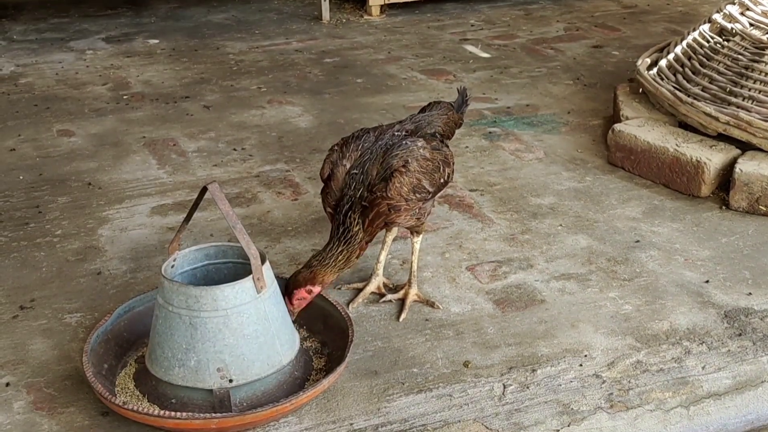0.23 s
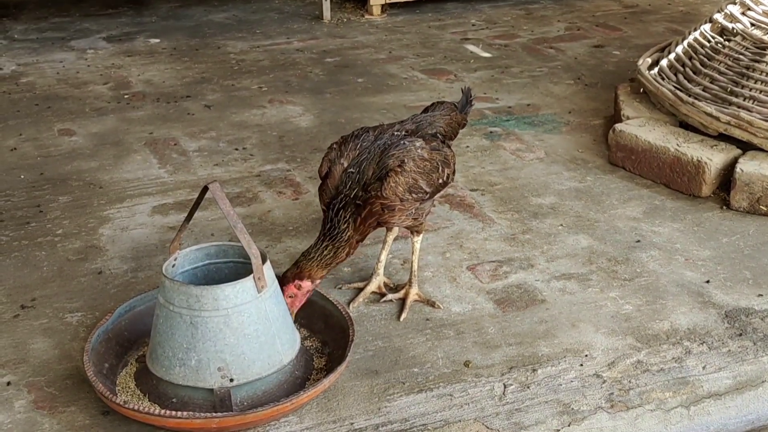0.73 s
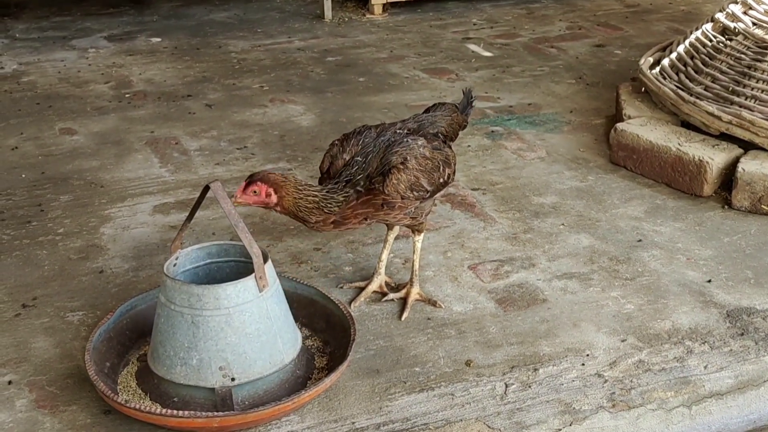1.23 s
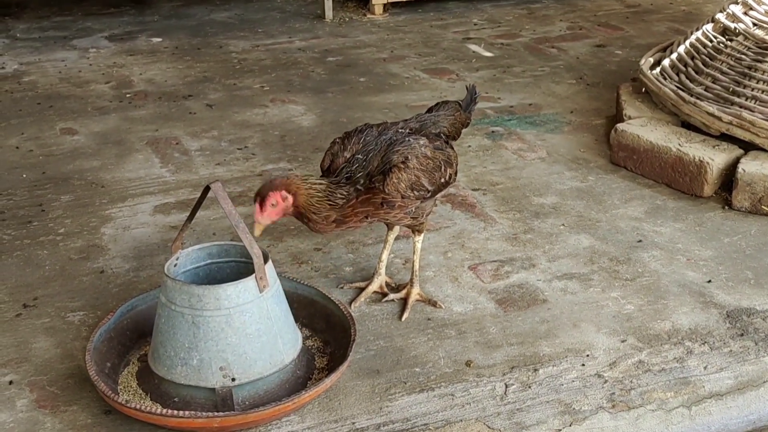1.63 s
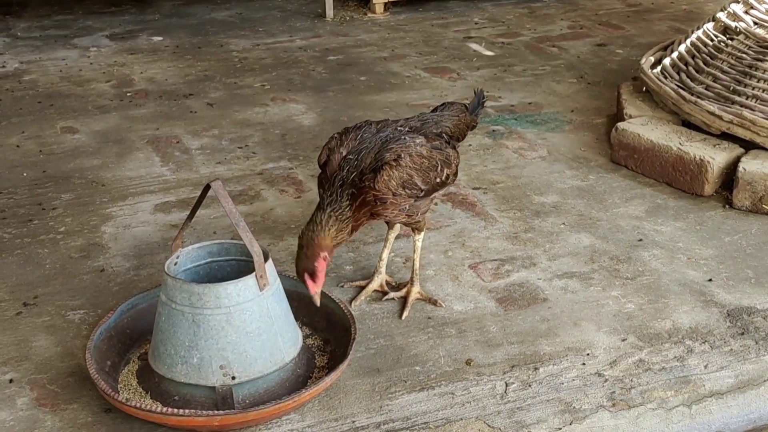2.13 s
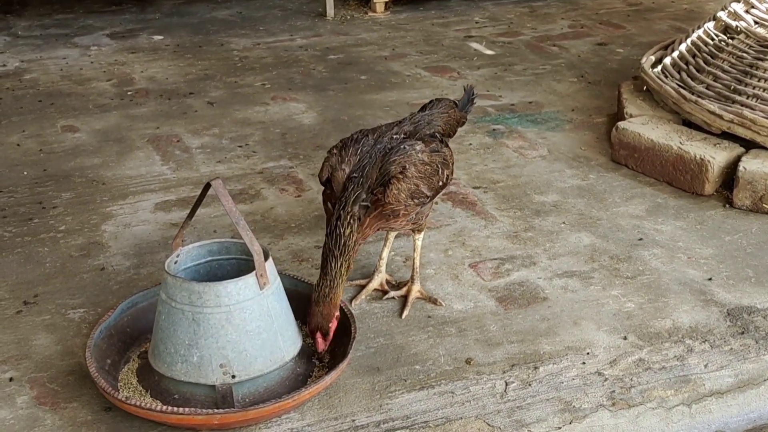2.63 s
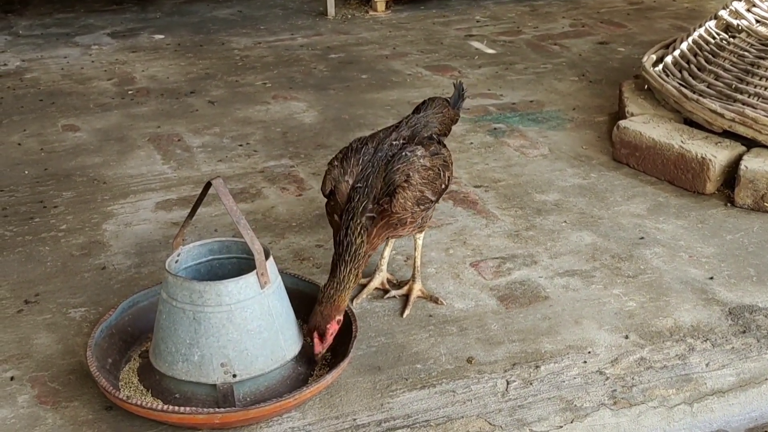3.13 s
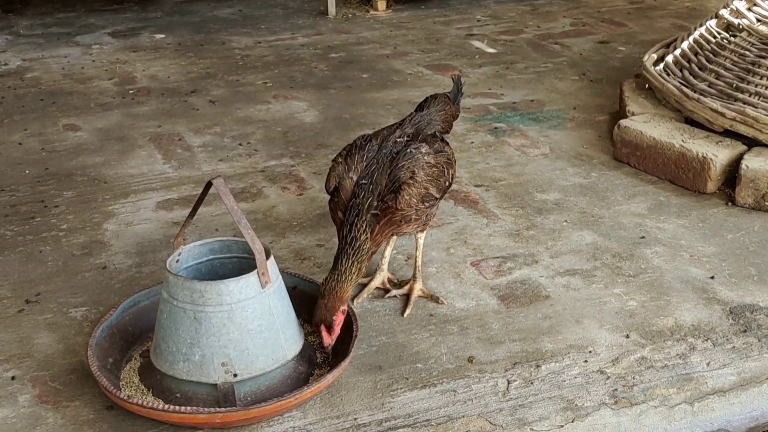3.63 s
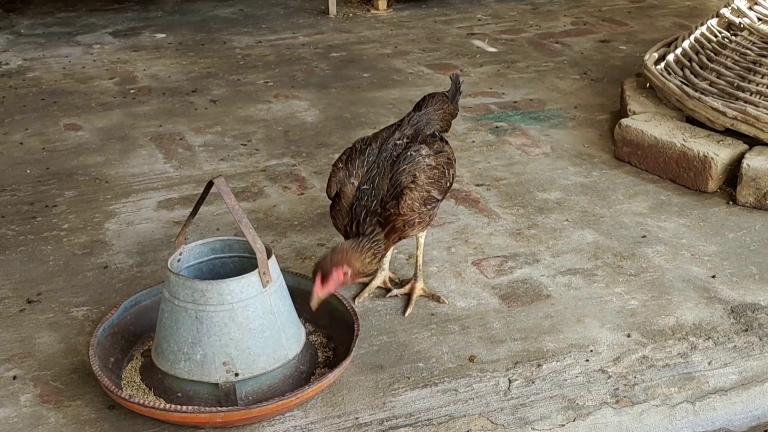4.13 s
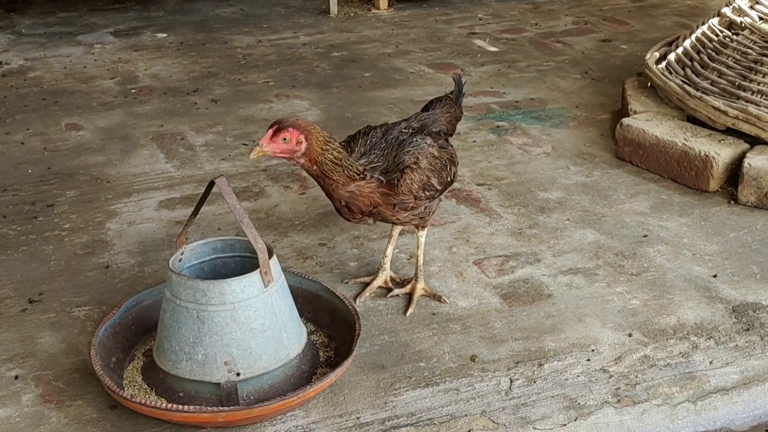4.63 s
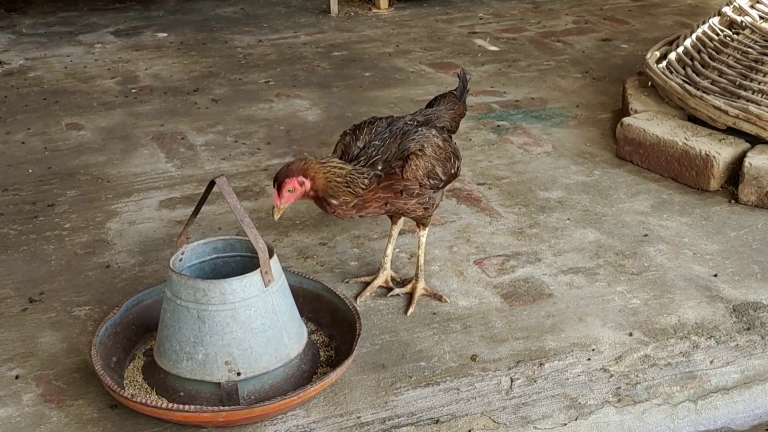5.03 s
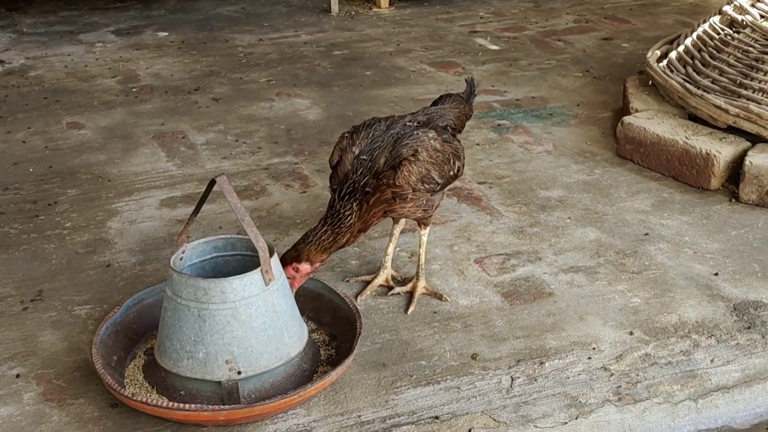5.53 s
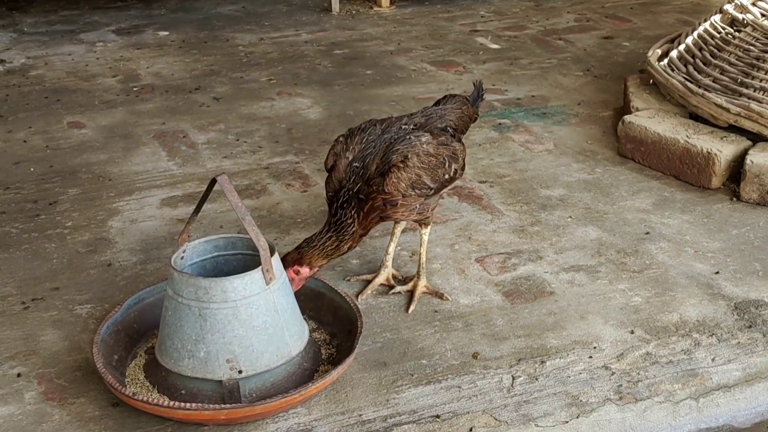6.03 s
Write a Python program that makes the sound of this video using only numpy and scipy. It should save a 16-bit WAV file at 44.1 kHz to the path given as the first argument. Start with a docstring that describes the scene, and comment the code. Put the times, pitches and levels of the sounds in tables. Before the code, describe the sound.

A hen feeds from a metal pan on a concrete floor under a roof. Beak taps ring the pan briefly and stir dry grain, with quiet throaty clucks between. A loud, cracking squawk bursts out at one second, a second hoarse one around four and a half. Final taps come near the end. A dull far-off hum runs throughout; a small stereo microphone catches short shed echoes.

```python
"""At a sheet-metal pan on a concrete floor, under a roof, a hen's beak first blows on the pan and stirs the grain
among soft throaty clucks; a loud squawk follows at 1 s. More clucks and blows and two snapping kernels lead to
a second squawk at 4.5 s; the last blows ring the pan near the end. Throughout, a dull farmyard hum lies far off.
The calls are pulses and air hiss through throat resonances, the pan is decaying sines, grain and hum are shaped
noise; all but the hum and the snaps also echo in the shed. A small two-port microphone hears it."""
import sys
import numpy as np
from scipy import signal
from scipy.fft import rfft, irfft
from scipy.io import wavfile
from scipy.ndimage import uniform_filter1d

SR = 44100
rng = np.random.default_rng(int(sys.argv[2]) if len(sys.argv) > 2 else 0)


def bounce(signal):
    """Save signal as a 16-bit WAV file at the path given by the first command-line argument."""
    frames = np.transpose(np.atleast_2d(signal))
    limited = np.clip(frames, -1, 1)
    pcm = np.round(limited * 32767).astype(np.int16)
    wavfile.write(sys.argv[1], SR, pcm)


N = 277521  # length in samples

# Soft clucks. Each row: start in s, length in s, relative effort in dB, swell from first pulse to full effort
# in dB, pitch in Hz, beak opening as a factor on the throat, edge at 1.3-3 kHz in dB, left over right in dB.
CLUCKS = [(0.235, 0.043486, -33, 4, 224, 1.115, 7.5, 1), (0.931, 0.044, -30.5, 3.5, 216.8, 1.09, 3.5, 0.5),
          (2.194, 0.036, -38.5, 6, 211, 0.97, 2, -2), (2.402, 0.038, -32.5, 10, 219.5, 1.045, -3, -1),
          (2.606, 0.037, -31.5, 9.5, 224.3, 1.11, -2, -.3),
          (3.087, 0.037955, -29, 4.5, 251.3, 1.0531, -5, -0.5),
          (3.356, .033, -30.5, 3, 207.7, 1.113, 9, 1.2), (3.938, 0.031, -30, 3.5, 207.7, 1.13, 8.5, -0.5),
          (4.353, 0.04435, -36, 8, 222.2, 1.03, 3, 0)]
# Loud squawks, one list each. Each row: time in s, relative effort in dB, pitch in Hz, beak opening as a factor.
SQUAWKS = [
    [(1.008, -36, 332.7, 0.79), (1.028, -22.5, 295.5, 0.51), (1.04, -10, 300.3, 0.929),
     (1.1, -14.5, 294.2, 1.022), (1.12, -19.5, 288.1, 1.014), (1.166, -21.5, 289.8, 1.025),
     (1.2, -14, 297, 0.977), (1.245, -15, 320.2, 1.01), (1.272, -34.5, 282, 1.22)],
    [(4.47, -19, 361.5, 0.87), (4.48, -13, 351.3, 0.99), (4.512, -11, 347.3, 0.91),
     (4.53, -15.5, 293.7, 0.98), (4.61, -16.5, 292.9, 0.97), (4.675, -14.5, 289.8, 1.048),
     (4.695, -17.5, 305, 0.92), (4.715, -26, 280.5, 0.94), (4.742, -42.5, 243.8, 0.74)],
]
# Throat resonances for the voice pulses, of the clucks and then of each squawk.
# Each row: centre in Hz with the beak factor at 1, width in Hz, relative level in dB.
SOFT_THROAT = [(237, 150, -1.5), (464, 230, 3), (761, 240, 7), (1018, 192, 4.5), (1460, 100, -13.5),
               (1806, 160, -27), (3580, 1200, -23), (5310, 1600, -31.5)]
LOUD_THROATS = [
    [(564, 270, -10), (887, 220, -5), (1171, 174, 5), (1392, 200, -0.5), (1794.2, 214, -9.5),
     (2434, 250, -14), (3070, 320, -19), (3400, 150, -17.5)],
    [(636, 440, -14), (977.28, 108, -0.5), (1212, 165, 4.5), (1400, 146, 3), (2313, 180, -12),
     (3758.5, 1200, -21.5), (5620, 1400, -30)],
]
# Resonances of the air hiss, likewise. Each row: centre in Hz, width in Hz, relative level in dB.
SOFT_AIR = [(1940, 920, -8), (3600, 3200, -29.5), (7314, 1131.2, -14.5), (12200, 4600, -23)]
LOUD_AIRS = [
    [(2850, 900, -21), (3620, 820, -22.5), (6700, 2600, -35.5), (7960, 4700, -28), (12600, 3000, -37)],
    [(2430, 650, -15.5), (3880, 1000, -28), (5660, 370, -22.5), (8160, 6000, -25.5), (13500, 2500, -37)],
]
# The squawking voice cracks and bursts out. Each row: time in s, burst in dB, fading time constant in s.
CRACKS = [(1.121, 13, .015), (1.167, 10, .025), (1.203, 5, .012)]
# Clear spells in the hoarse squawks. Each row: from in s, to in s, roughness from 0 to 1.
CLEAR_SPELLS = [(1.088, 1.24, .24), (4.46, 4.517, .4), (4.612, 4.682, .03)]
# Direct sound of each squawk at the ports. Each row: left in dB, right in dB, left later by s.
SQUAWK_FACING = [(1, 1.5, 0.00021), (2, 4.5, .00007)]
# Beak blows on the pan. Each row: time in s, relative peak in dB, centre of the blow's spectrum in Hz.
BLOWS = [(.007, -30, 486), (0.309, -31, 540), (.466, -46, 320), (0.598, -26.5, 880), (.622, -32, 435.9),
         (2.802, -45.5, 320), (2.829, -33, 615.1), (2.866, -29, 503), (5.835, -23.5, 840),
         (5.856, -31, 388.6), (5.88, -28, 514), (6.132, -27, 780), (6.161, -29, 480), (6.193, -34.5, 466.1)]
# Modes of the sheet-metal pan. Each row: nominal frequency in Hz, relative level in dB, 60 dB decay in s.
PAN_MODES = [(232.6, 0, 0.45), (316.2, 6, 0.12), (475.64, -3.5, 0.1), (546, 6, 0.061), (841, 3.2, 0.062),
             (1126, 2.5, 0.05435), (1428, -4.5, 0.1732), (2337, -5.5, 0.068), (3000, 1, 0.037),
             (3625, 13, 0.097)]
# Grain stirred by the beak. Each row: start in s, relative level in dB, 60 dB decay in s.
STIRS = [(0.0024, -40, 0.087), (0.2852, -37, 0.19), (0.4604, -52.5, 0.12), (0.602, -40, 0.24),
         (0.744, -51.5, 0.17), (2.8265, -37, 0.27), (2.8664, -43, 0.067), (3.3538, -38.5, 0.21),
         (3.9416, -37, 0.13), (5.835, -39, 0.24), (5.884, -47.5, 0.27), (6.1325, -41, 0.17)]
# Spectrum of the sliding kernels. Each row: frequency in Hz, relative density in dB per Hz.
GRAIN_SPECTRUM = [(880, -11), (1500, -1), (1810, -7.5), (1980, -2.5), (5380, -7), (6120, -14.5),
                  (7170, -7.5), (13900, -15.5), (16000, -24)]
# Single kernels snapping. Each row: time in s, relative level in dB.
SNAPS = [(2.305, -37.5), (2.5288, -37)]
# Spectrum of a snap. Each row: frequency in Hz, gain in dB.
SNAP_SPECTRUM = [(800, -18.5), (2000, 8.5), (5000, -6), (9000, 8.5), (14000, -5.0)]
# Early echoes off walls and floor. Each row: nominal delay in s, left in dB, right in dB.
ECHOES = [(.0021, -21.5, -17), (.0063, -14.5, -9.5), (.013, -14, -25), (.052, -23, -37)]
# Dying of the shed's tail. Each row: frequency in Hz, 60 dB decay in s.
SHED_DECAY = [(200, 0.76), (600, 0.34), (1200, 0.37), (2500, 0.28), (6000, 0.29), (12000, 0.27)]
# Likeness of the two ports, for shed and yard. Each row: frequency in Hz, likeness from 0 to 1.
PORT_LIKENESS = [(60, 0.95), (300, 1), (700, 0.96), (1500, 0.18), (3500, 0.31), (8000, 0.087)]
# Spectrum of the distant yard. Each row: frequency in Hz, relative density in dB per Hz.
YARD_SPECTRUM = [(15, -80), (25, -48.5), (48, -34.5), (92, -10.5), (149, -14.5), (186, -1.5), (212, -7),
                 (302, -4.5), (454, -14.5), (663, -11.5), (869, -18), (2120, -22.5), (3860, -36.5),
                 (14900, -42), (16200, -48)]
# Uneven level of the background noise. Each row: time in s, relative low level in dB, relative mid level in dB.
BACKGROUND_LEVEL = [(0, -45.5, -61), (.7, -48.5, -59), (1.5, -52.5, -54), (2.1, -48, -61.5),
                    (2.8, -44, -63), (3.8, -50, -58), (4.4, -46.5, -59.5), (5.6, -46.5, -60.5),
                    (6.29, -48.5, -58)]
# How far the spectrum follows each of these levels. Each row: frequency in Hz, share.
LOW_SHARE = [(500, 1), (1200, 0.44)]
MID_SHARE = [(500, 0.84), (1200, 1.0), (3000, 0.53), (6000, 0.4)]
# Colour of the microphone's ports. Each row: frequency in Hz, left over right in dB.
PORT_COLOUR = [(300, -0.9751), (1000, 2), (2500, 4.5), (6000, 2), (13000, 2)]

CLUCK_PEAK, CLUCK_SAG_DB = .6, -1.5  # full effort after this share of the length, then a slight sag
FLAT_START, SHUT_PER_DB = .94, .02  # pitch starts flat; the weaker the start, the more closed the beak
CLUCK_ROUGH, SQUAWK_ROUGH = .09, .8  # roughness from 0 to 1
CLUCK_DIRECT_DB, CLUCK_LAG_S = 2.33, .0002  # the left port hears clucks later
CATCH_S, CLEARING_S = .004, .015  # the voice catches before a crack; hoarseness fades over a spell's edge
AIR_APART = .7  # noise weight of each port's own hiss; the rest is common
ROCK_S, ROCK_DB, ROCK_HZ = .031, -10.5, 315  # a dull blow's low knock: delay, level change, centre
EDGE_HZ = 15900  # the recorder's band limit


def hen():
    """All calls, straight from the hen to each port and as they fill the shed."""
    direct, source = np.zeros((2, N)), np.zeros(N)

    def utter(s, voice, left_db, right_db, later):
        add(direct[0], s + later, gain_of(left_db) * voice[0])
        add(direct[1], s, gain_of(right_db) * voice[1])
        add(source, s, voice[1])

    for *row, edge_db, side_db in CLUCKS:
        throat, air = ([(f, w, db + edge_db * (1300 < f < 3000)) for f, w, db in tube]
                       for tube in (SOFT_THROAT, SOFT_AIR))
        voice = call(cluck(*row), throat, air, hoarse=CLUCK_ROUGH, jitter=.12, shimmer_db=12.,
                     wander=.06, flutter=0, lowest_hz=120)
        utter(row[0], voice, CLUCK_DIRECT_DB + side_db / 2, CLUCK_DIRECT_DB - side_db / 2, CLUCK_LAG_S)
    for rows, throat, air, facing in zip(SQUAWKS, LOUD_THROATS, LOUD_AIRS, SQUAWK_FACING):
        voice = call(rows, throat, air, hoarse=SQUAWK_ROUGH, jitter=.08, shimmer_db=4.,
                     wander=.04, flutter=.35, lowest_hz=450)
        utter(rows[0][0], -voice, *facing)
    return direct + shed(source, tail_db=-6.5)


def cluck(start, length, effort_db, swell_db, hz, beak):
    """Start, peak and end of a cluck: effort swells as pitch rises and the beak factor settles, then sags."""
    first_beak = beak * (1.5 - SHUT_PER_DB * swell_db)
    return [(start, effort_db - swell_db, hz * FLAT_START, first_beak),
            (start + CLUCK_PEAK * length, effort_db, hz, beak),
            (start + length, effort_db + CLUCK_SAG_DB, hz, beak)]


def call(rows, throat, air, hoarse, jitter, shimmer_db, wander, flutter, lowest_hz):
    """Syrinx pulses, uneven in time and size when rough, and puffs of air pass the throat."""
    s, *columns = np.transpose(rows)
    t = np.arange(s[0], s[-1] + 0.01, 1 / SR)
    effort_db, hz, beak = (np.interp(t, s, c) for c in columns)
    rough = hoarse
    for start, end, clear in CLEAR_SPELLS:
        inside = np.clip(np.minimum(t - start, end - t) / CLEARING_S + .5, 0, 1)
        rough = rough - (hoarse - clear) * inside
    for at, db, fade in CRACKS:
        away = abs(t - at)
        effort_db += db * np.where(t > at, np.exp(-away / fade), -np.exp(-away / CATCH_S))
    effort = gain_of(effort_db) * (t < s[-1])

    early, size_db, drift = rng.uniform(-1.019, 1, (200, 3)).T  # one draw for each cycle
    steady = .8 + np.cumsum(hz) / SR  # cycles so far; the first pulse follows at once
    drifting = np.cumsum(hz * wander * rough * drift[steady.astype(int)]) / SR
    # a slack membrane flutters about once in five cycles
    slow = np.sin(2 * np.pi * (steady + 2 * drifting) / 5)
    uneven = jitter * np.interp(steady, np.arange(len(early)), early) + 0.072 * flutter * slow
    turns = steady + drifting + rough * uneven

    pulses = evened(sum(np.cos(2 * np.pi * k * turns) for k in range(1, 22)))
    pulses *= gain_of(shimmer_db * rough * size_db[(turns + .5).astype(int)])
    pulses *= 1 + flutter * rough * slow
    voice = sum(gain_of(db) * resonate(effort * pulses, f * (beak if f < 2000 else 1), w)
                for f, w, db in throat)
    # a small bird radiates little bass
    voice = signal.sosfilt(signal.butter(4, lowest_hz, "high", fs=SR, output="sos"), voice)

    common, left, right = rng.standard_normal((3, len(t)))
    hiss = (1 - AIR_APART) * common + AIR_APART * np.array([left, right])
    puffs = evened((0.56 + np.exp(-(turns % 1) / 0.68)) * hiss)
    flow = signal.lfilter([.004], [1, -.996], effort)  # the hiss builds up behind the voice
    voice = voice + sum(gain_of(db) * resonate(flow * puffs, f, w) for f, w, db in air)
    return evened(voice) * np.sqrt(np.mean(effort ** 2))


def pan():
    """Each blow rings the pan modes near its centre: soft blows through the grain are low and slow."""
    out, t = np.zeros(N), np.arange(SR // 4) / SR
    hz, db, t60 = np.transpose(PAN_MODES)[:, :, None]
    # after each dull blow the pan rocks back onto the floor with a low knock
    rocks = [(s + ROCK_S, peak_db + ROCK_DB, ROCK_HZ) for s, peak_db, centre_hz in BLOWS if centre_hz < 700]
    blows = BLOWS + rocks
    spot = rng.standard_normal((len(blows), len(PAN_MODES), 2))  # where the beak lands
    for (s, peak_db, centre_hz), luck in zip(blows, spot):
        level_db = db - 13.2 * abs(np.log2(hz / centre_hz)) + luck[:, :1]
        detuned_hz = hz * (1 + 0.025 * luck[:, 1:])
        ring = (gain_of(level_db - 60 * t / t60) * np.sin(2 * np.pi * detuned_hz * t)).sum(0)
        ring *= np.minimum(t * centre_hz / 0.69, 1)  # duller blows start more slowly
        add(out, s, gain_of(peak_db + 4.5) * ring / abs(ring).max())
    return out


def grain():
    """Dense tiny clicks of sliding kernels die away after each stir."""
    power, t = np.zeros(N), np.arange(SR // 2) / SR
    for s, level_db, t60 in STIRS:
        add(power, s, gain_of(2 * (level_db - 60 * t / t60)) * np.minimum(t / .005, 1) ** 2)
    clicks = rng.standard_normal((2, N)) * gain_of(2.75 * rng.exponential(1, N))
    clicks *= rng.random(N) < .3  # three samples in ten hold a click
    return np.sqrt(power) * evened(coloured(clicks, lambda hz: read(GRAIN_SPECTRUM, hz)))


def ticks():
    """Lone kernels snap: a click, then a few milliseconds of fading noise."""
    out, t = np.zeros((2, N)), np.arange(240) / SR
    onset = t[30]
    for s, level_db in SNAPS:
        snap = (t == onset) + .4 * (t > onset) * rng.standard_normal((2, len(t)))
        snap *= gain_of(-60 * (t - onset) / 0.005)
        snap = coloured(snap, lambda hz: read(SNAP_SPECTRUM, hz))
        add(out, s - onset, gain_of(level_db + 12.0) * snap)
    return out


def shed(x, tail_db):
    """A few wall and floor echoes, then sparse taps that die band by band."""
    taps = np.zeros((2, SR))
    at = np.arange(300, SR - 20, 20) + rng.integers(0, 20, (2, (SR - 301) // 20))
    np.put_along_axis(taps, at, rng.choice([-1., 1.], at.shape), 1)
    hz, t, z = signal.stft(taps, SR, nperseg=256)
    alike = read(PORT_LIKENESS, hz)[:, None]  # long waves reach both ports alike
    z[0] = alike * z[1] + np.sqrt(1 - alike ** 2) * z[0]
    z *= gain_of(-60 * t / read(SHED_DECAY, hz)[:, None])
    tail = signal.istft(z, SR, nperseg=256)[1]
    tail *= gain_of(tail_db) / np.linalg.norm(tail[0])
    for k, (s, left_db, right_db) in enumerate(ECHOES):
        offsets = np.array([14, -6]) * (-1) ** k  # samples; the leading port alternates
        tail[[0, 1], round(s * SR) + offsets] += gain_of([left_db, right_db])
    return signal.fftconvolve(np.atleast_2d(x), tail, axes=1)[:, :N]


def yard():
    """Far traffic and machinery: random short-time spectra with drifting patches and an uneven level."""
    frames, hz = N // 256 + 5, np.fft.rfftfreq(1024, 1 / SR)
    a, b, c, d, patches = rng.standard_normal((frames, 513, 5)).T
    patches = evened(uniform_filter1d(uniform_filter1d(patches, 8, 0), 10, 1))
    s, low_db, mid_db = np.transpose(BACKGROUND_LEVEL)
    low, mid = (np.interp(np.arange(frames) * 256 / SR, s, v) for v in (low_db, mid_db))
    level_db = read(YARD_SPECTRUM, hz)[:, None] + 2.28 * patches
    level_db += read(LOW_SHARE, hz)[:, None] * (low - low.mean())
    level_db += read(MID_SHARE, hz)[:, None] * (mid - mid.mean())
    alike, right = read(PORT_LIKENESS, hz)[:, None], a + 1j * b
    lag = np.exp(-2j * np.pi * hz * 0.00028)[:, None]  # the left port lies farther from the hum
    left = alike * lag * right + np.sqrt(1 - alike ** 2) * (c + 1j * d)
    z = np.array([left, right]) * gain_of(level_db)
    noise = signal.istft(z, nperseg=1024, noverlap=768)[1][:, :N]
    return gain_of(low.mean() + 2.0) * evened(noise)


def gain_of(db):
    """Decibels to amplitude."""
    return 10 ** (np.asarray(db) / 20)


def evened(x):
    """Scales to rms 1."""
    return x / np.sqrt(np.mean(x ** 2) + 1e-20)


def read(points, hz):
    """Reads a spectrum on a log-frequency axis."""
    f, value = np.transpose(points)
    return np.interp(np.log(hz + 1), np.log(f + 1), value)


def add(mix, s, sound):
    """Mixes a sound in at time s."""
    part = mix[..., round(s * SR):][..., :sound.shape[-1]]
    part += sound[..., :part.shape[-1]]


def resonate(x, hz, width):
    """A steep resonance: shifts its centre hz down to zero, smooths twice, shifts back."""
    turn = np.exp(2j * np.pi * np.cumsum(hz * np.ones(x.shape[-1])) / SR)
    r = np.exp(-np.pi * width / SR)
    return 2 * (turn * signal.lfilter([(1 - r) ** 2], [1, -2 * r, r * r], x / turn)).real


def coloured(x, db):
    """Filters by a dB function of frequency."""
    hz = np.fft.rfftfreq(x.shape[-1], 1 / SR)
    return irfft(rfft(x) * gain_of(db(hz)), x.shape[-1])


def scene():
    """Hen, pan and grain share the shed; the yard hums behind."""
    knocks, kernels = pan(), grain()
    direct = np.array([np.roll(knocks, shift=6), knocks])  # the left port hears the pan later
    knocks = direct + shed(knocks, tail_db=-7.0)
    kernels = kernels + gain_of(0.5) * shed(kernels, tail_db=-8.0)
    return hen() + knocks + kernels + ticks() + yard()


def record(dry):
    """A small microphone loses deep bass, its two ports differ in colour, peaks round off; then the band limit."""
    thin = signal.sosfilt(signal.butter(2, 90, "high", fs=SR, output="sos"), dry)
    thin = coloured(thin, lambda hz: np.outer([.5, -.5], read(PORT_COLOUR, hz)))
    rounded = 1.2 * np.tanh(thin / 1.2)
    band_limit = signal.firwin(511, EDGE_HZ, window=("kaiser", 9), fs=SR)
    return signal.oaconvolve(rounded, band_limit[None], "same")


dry = scene()
out = record(dry)
bounce(out)
```